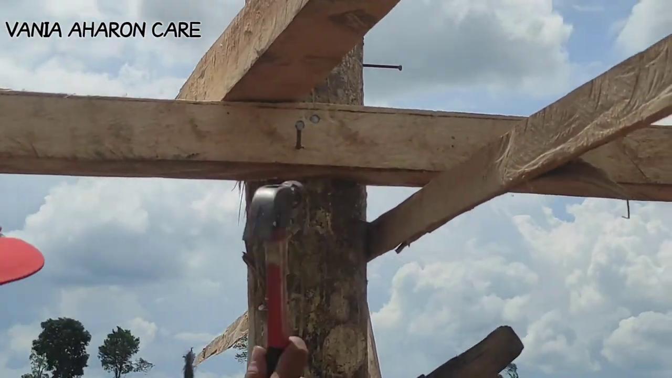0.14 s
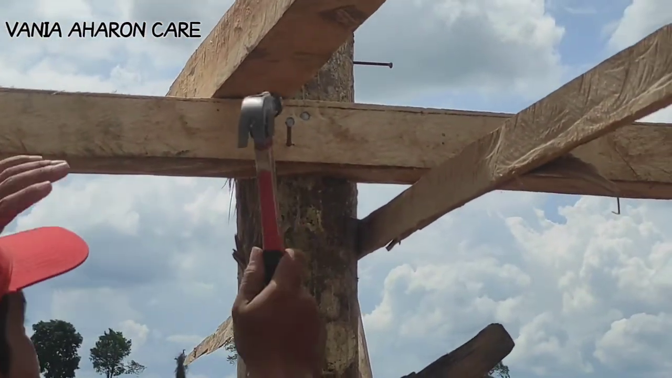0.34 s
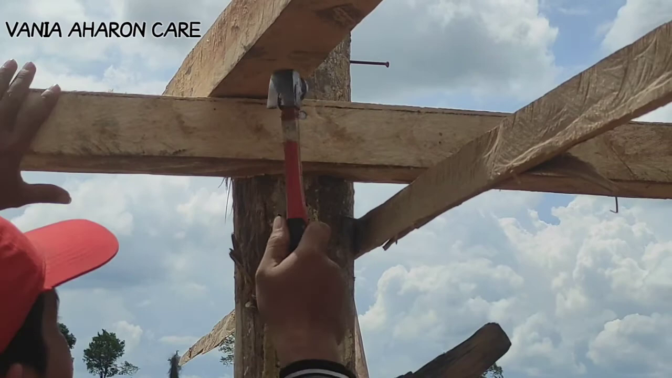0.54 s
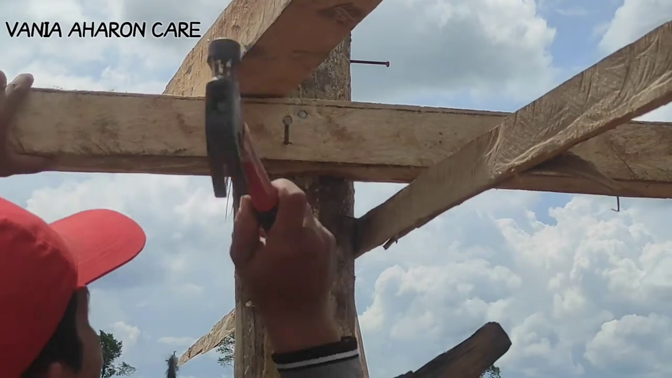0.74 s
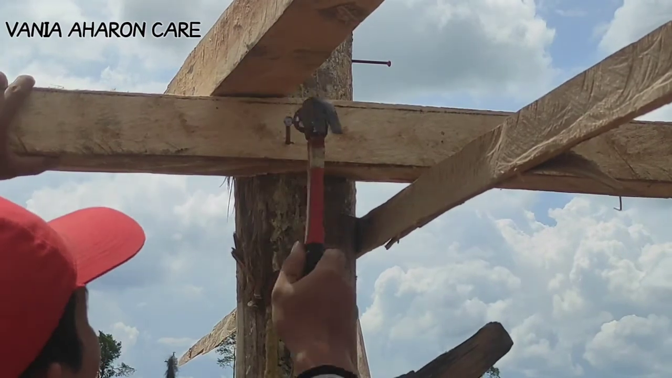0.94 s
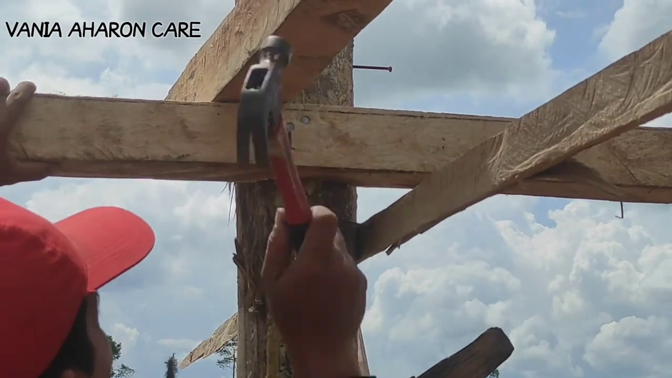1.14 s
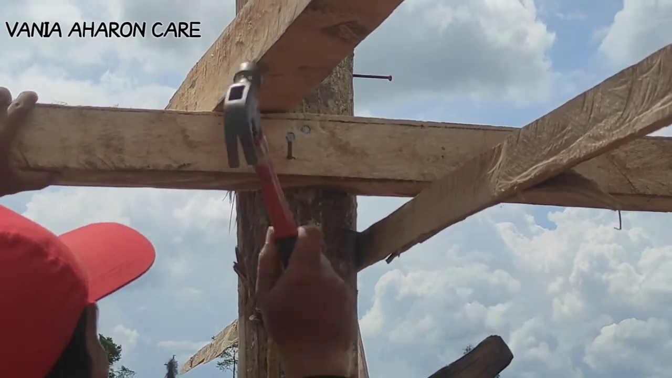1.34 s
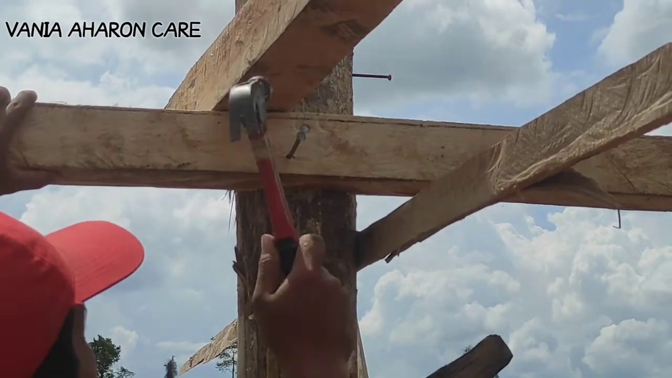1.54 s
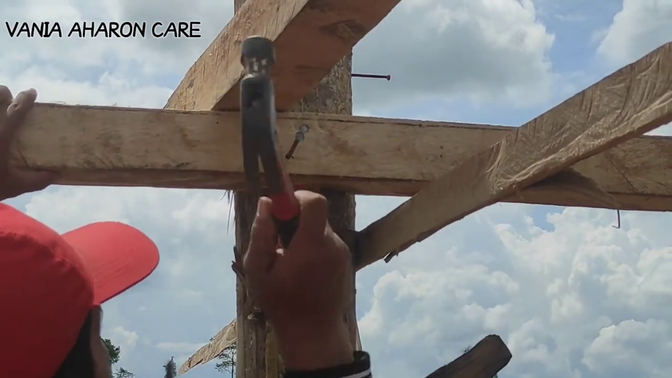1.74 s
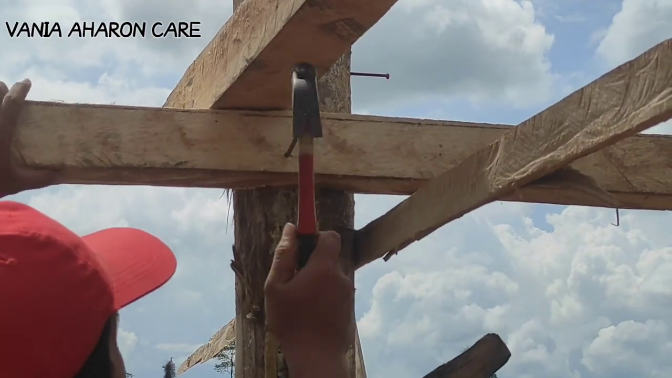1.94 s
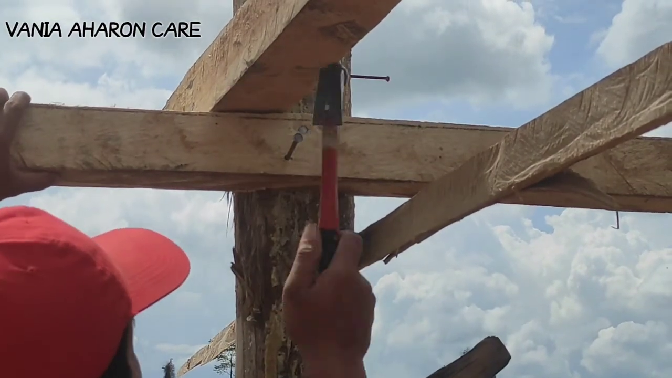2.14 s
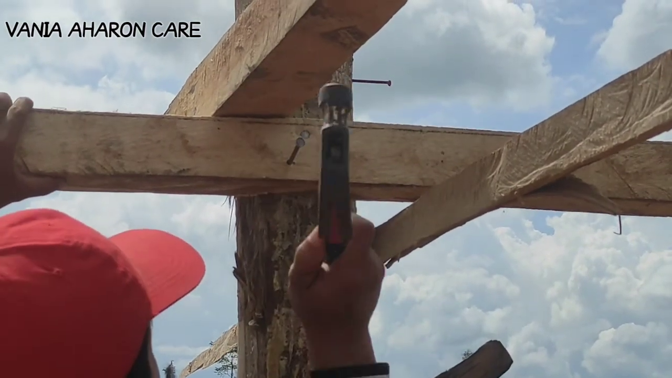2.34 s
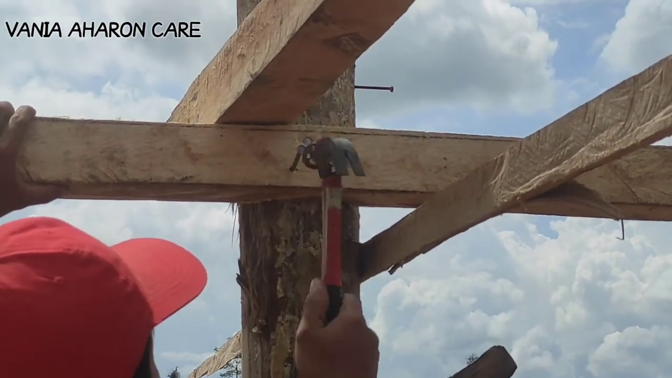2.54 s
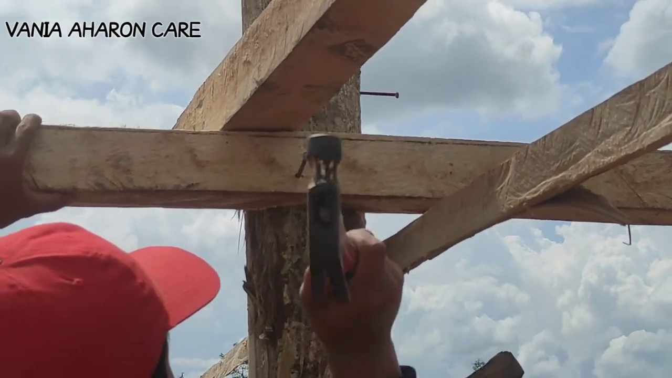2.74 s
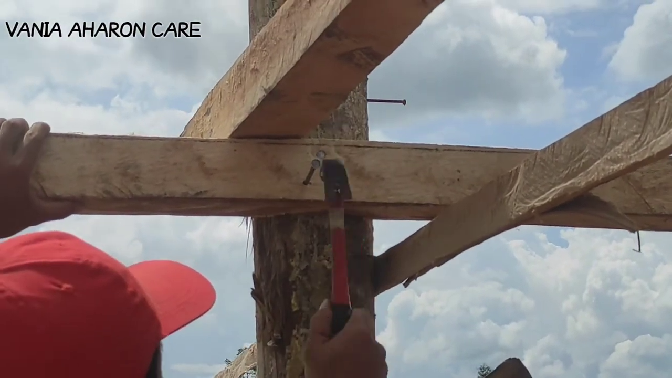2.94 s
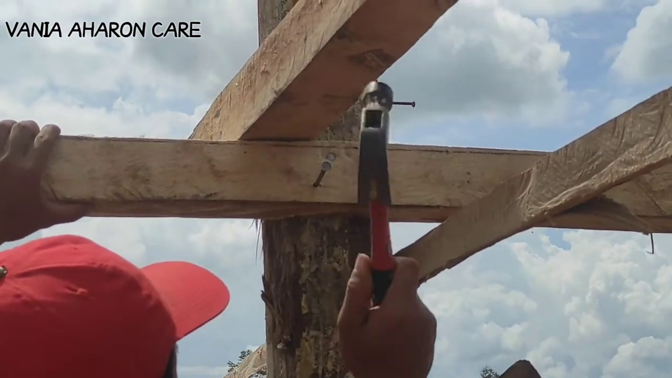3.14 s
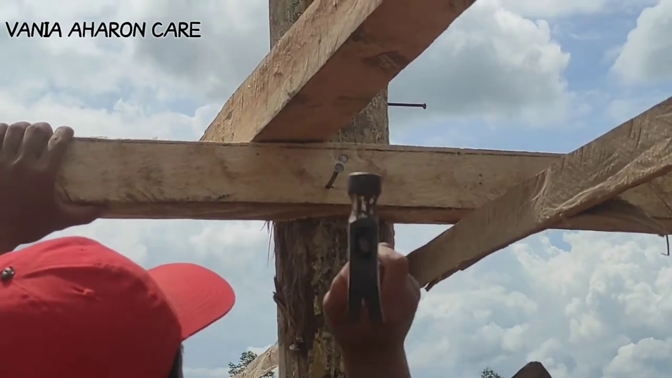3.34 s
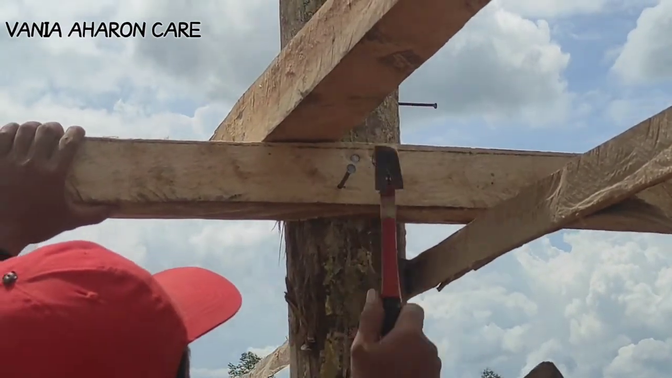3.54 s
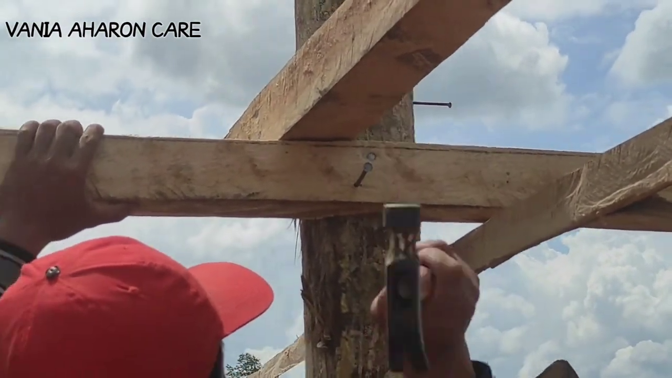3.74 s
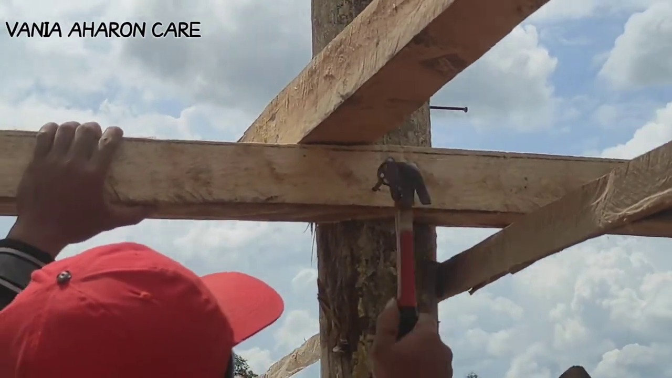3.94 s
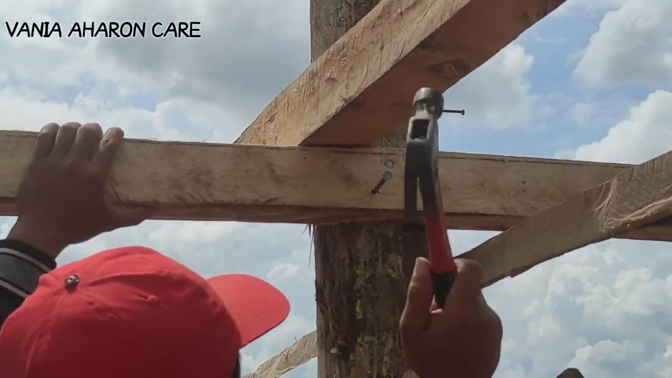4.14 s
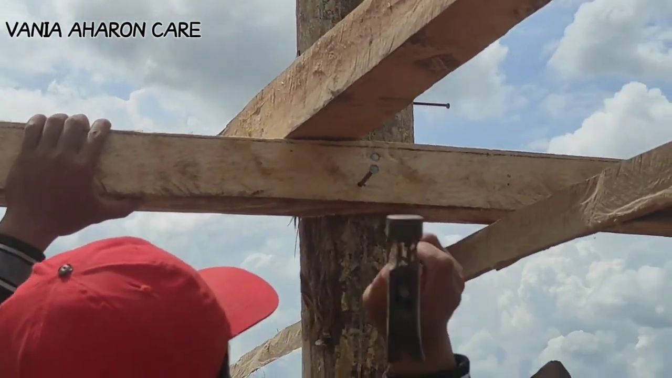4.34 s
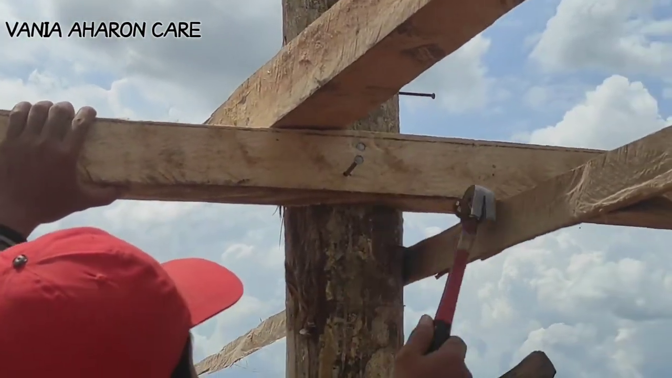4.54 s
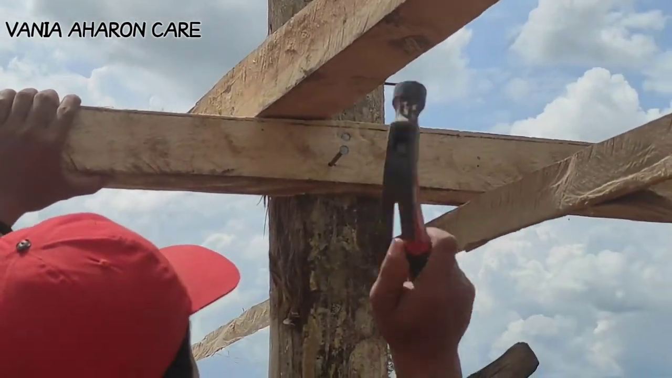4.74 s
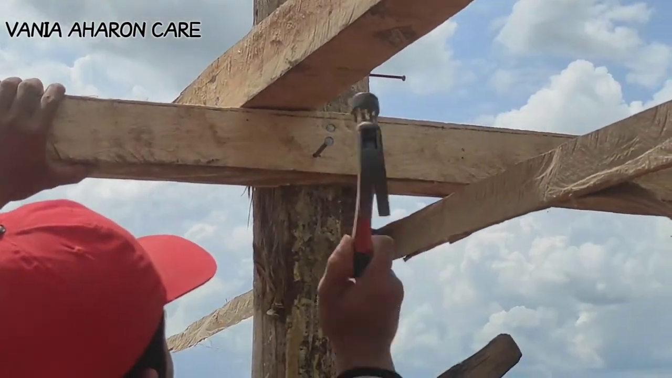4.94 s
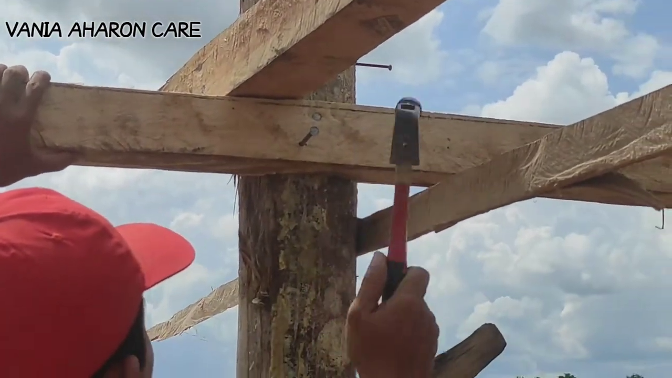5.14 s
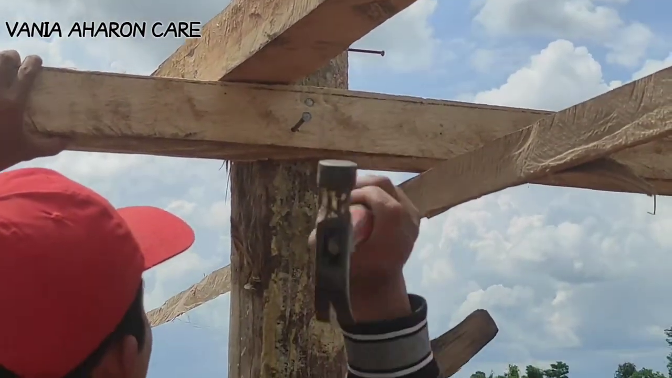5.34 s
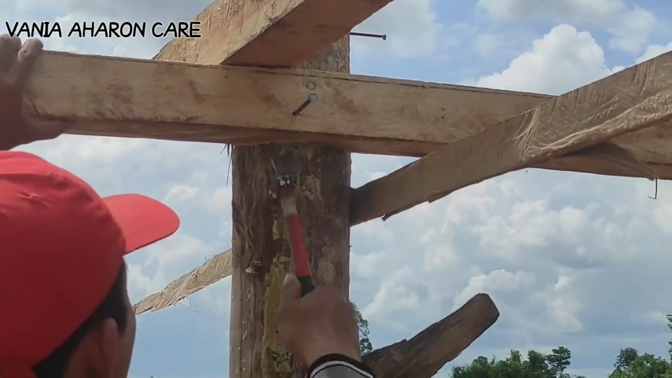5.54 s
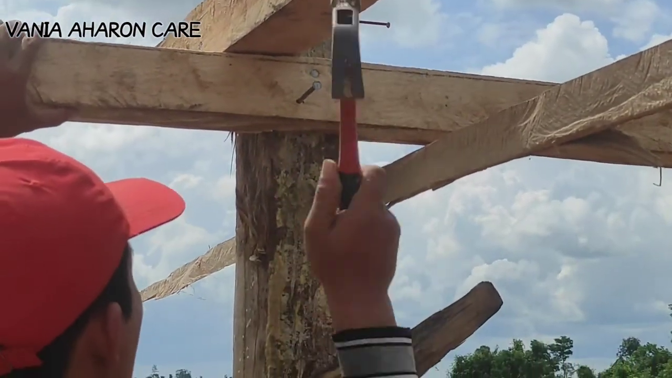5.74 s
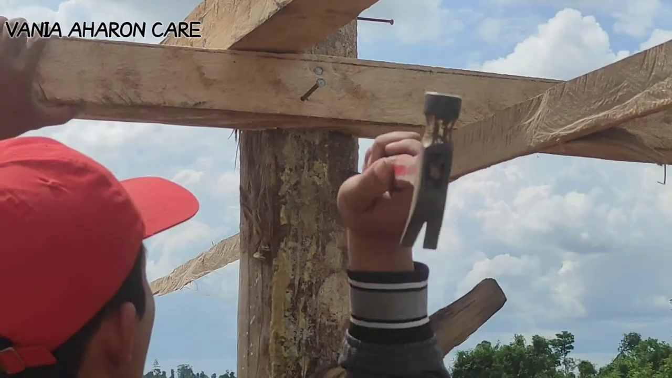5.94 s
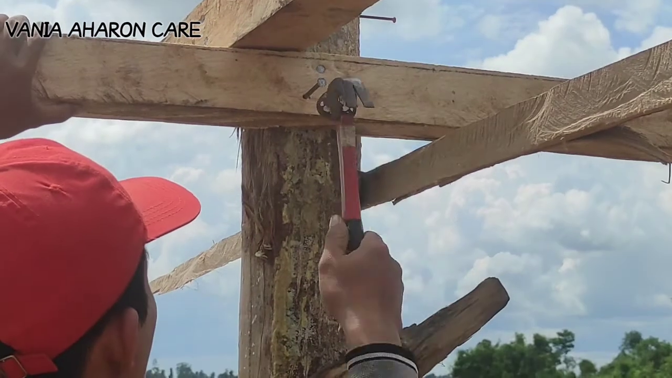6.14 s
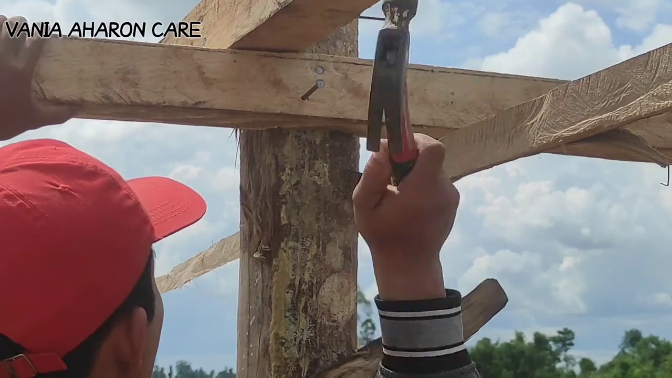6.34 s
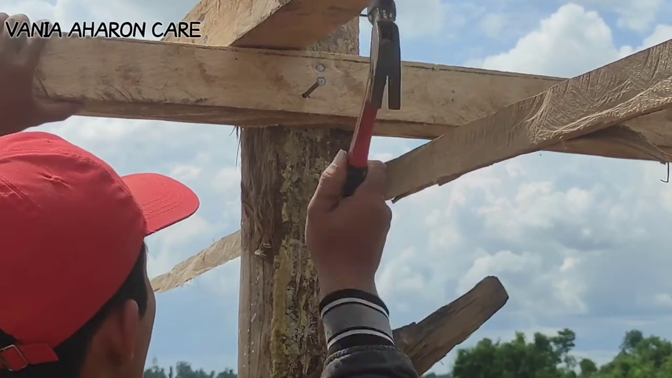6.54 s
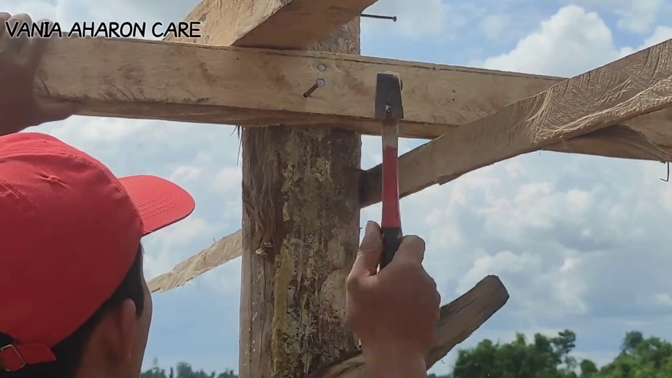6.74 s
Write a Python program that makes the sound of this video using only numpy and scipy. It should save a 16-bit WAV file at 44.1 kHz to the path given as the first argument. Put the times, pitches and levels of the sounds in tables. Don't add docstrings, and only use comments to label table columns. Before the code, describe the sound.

Steady hammer blows on a nail in a wooden frame, each a loud crack, hollow knock and high metallic ping, with breeze and faint birds.

```python
import sys
import numpy as np
from scipy import signal
from scipy.fft import rfft, irfft, next_fast_len
from scipy.io import wavfile
from scipy.ndimage import uniform_filter1d

SR = 44100
rng = np.random.default_rng(int(sys.argv[2]) if len(sys.argv) > 2 else 0)


def linear_from_db(decibels):
    return 10 ** (np.asarray(decibels, float) / 20)


def generate_wav(sig):
    pcm = np.round(np.clip(np.atleast_2d(sig).T, -1, 1) * 32767).astype(np.int16)
    wavfile.write(sys.argv[1], SR, pcm)


N = 299439


def at_hz(points, hz):
    points = np.array(points)
    return np.interp(np.log(hz), np.log(points[:, 0]), points[:, 1])


def in_time(rows):
    s, *columns = np.transpose(rows)
    return [np.interp(np.arange(N) / SR, s, c) for c in columns]


def rms_one(x):
    return x / np.sqrt(np.mean(x ** 2) + 1e-20)


def panned(db):
    return linear_from_db(np.minimum(np.array([db, -db]), 0))


def clicks(times, heights):
    out = np.zeros(np.shape(heights)[:-1] + (N,)) + 1e-18
    out[..., [round(s * SR) for s in times]] = heights
    return out


def drift(rate):
    r = np.exp(-2 * np.pi * rate / SR)
    slow = signal.lfilter([1], [1, -2 * r, r * r], rng.standard_normal((2, N + SR)))
    return rms_one(slow)[:, SR:]


def ring(x, hz, t60):
    r, w = linear_from_db(-60 / (t60 * SR)), 2 * np.pi * hz / SR
    return signal.lfilter([0, np.sin(w)], [1, -2 * r * np.cos(w), r * r], x)


def dying(x, t60):
    return signal.lfilter([1], [1, -linear_from_db(-60 / (t60 * SR))], x)


def filtered(x, order, hz, kind="low"):
    return signal.sosfilt(signal.butter(order, hz, kind, fs=SR, output="sos"), x)


# hz, likeness (0 to 1)
ALIKE = [(200, 0.97), (450, 0.61), (1000, 0.24), (2000, 0.028), (16000, 0)]


def likeness(hz):
    return np.clip(at_hz(ALIKE, hz), 0, 1)


def bands(low, high):
    edges = low * 2 ** np.arange(0, np.log2(high / low) + .01, 1 / 3)
    white = rng.standard_normal((2, 2, N))
    for k, (a, b) in enumerate(zip(edges, edges[1:])):
        mid, side = filtered(white[k % 2], 2, [a, b], "band")
        hz = np.sqrt(a * b)
        alike = likeness(hz)
        yield hz, np.sqrt(1 + alike) * mid + np.sqrt(1 - alike) * side * [[1], [-1]]


def bell(at, width):
    out = np.zeros(N)
    near = np.arange(max(int((at - 4 * width) * SR), 0), min(int((at + 4 * width) * SR), N))
    out[near] = np.exp(-.5 * ((near / SR - at) / width) ** 2)
    return out


# time_s, level_db
INSECT_LEVEL = [(0, -102), (.2, -74), (.55, -75), (.85, -77), (.95, -92.5), (1.3, -67), (1.5, -73),
                (1.9, -85.5), (2.4, -77.5), (2.8, -87), (3.3, -68), (3.5, -90), (3.9, -75.5), (4.4, -87),
                (5.0, -75), (5.3, -88.5), (5.9, -77.5), (6.79, -80.5)]


def insects():
    band = filtered(rng.standard_normal((2, N)), 4, [2340, 2600], "band")
    return rms_one(band) * linear_from_db(in_time(INSECT_LEVEL)[0] + 2.0 * drift(30))


# hz, level_db (per Hz)
LEAF_COLOUR = [(180, -30.5), (300, -21), (496, -19), (577, -18), (694, -25), (742, -24), (1040, -24),
               (1400, -25), (2000, -23), (2500, -26), (3150, -26.5), (4000, -28.5), (5000, -29.5),
               (6400, -28), (8000, -28.5), (10000, -44.5), (14700, -59.5), (16500, -65.5)]
# time_s, level_db
LEAF_RUSTLE = [(0.0, -72), (.15, -76), (0.3, -64.5), (0.56, -69.5), (0.9, -76.5), (1.2, -73.5),
               (1.49, -68.5), (1.85, -76.5), (2.35, -73), (3.4, -76.5), (3.75, -69.5), (4.0, -69),
               (4.4, -77), (5.6, -78.5), (5.9, -68.5), (6.45, -84), (6.79, -58.5)]
# time_s, level_db
LEAF_HISS = [(0, -67.5), (.2, -66.5), (.55, -61), (.9, -73), (1.3, -65.5), (1.5, -69), (1.85, -68),
             (2.1, -71.5), (2.5, -70.5), (3.0, -71), (3.5, -72), (3.9, -66.5), (4.4, -70.5), (5.0, -69.5),
             (5.5, -67.5), (5.9, -67.5), (6.45, -71.5), (6.79, -60.5)]


def leaves():
    rustle = linear_from_db(in_time(LEAF_RUSTLE)[0] + 36.0 + 2.6 * drift(4.5))
    hiss = linear_from_db(in_time(LEAF_HISS)[0] + 29.5 + 0.75 * drift(6))
    return rustle, hiss, hiss * linear_from_db(-8.0)


# start_s, length_s, start_hz, end_hz, level_db
BIRD_CALLS = [(0.285, 0.05, 5840, 5640, -63), (0.912, 0.037, 5450, 5650, -60),
              (1.413, 0.066, 5920, 5540, -46.5), (2.773, 0.047, 4000, 4000, -61),
              (2.812, 0.022, 5050, 5050, -62), (3.243, 0.046, 2510, 2180, -56.5),
              (3.3, 0.029, 2320, 2270, -62), (4.954, 0.034, 2450, 2200, -69.5),
              (3.007, 0.031, 4500, 4270, -58), (5.265, 0.039, 4030, 4070, -60.5),
              (5.303, 0.041, 5100, 5000, -61), (5.507, 0.046, 4460, 4200, -54)]


def birds():
    out = np.zeros(N)
    for s, length, start_hz, end_hz, level_db in BIRD_CALLS:
        u = np.linspace(0, 1, int(length * SR))
        phase = 2 * np.pi * np.cumsum(start_hz + (end_hz - start_hz) * u ** 2) / SR
        first = int(s * SR)
        out[first:first + len(u)] += linear_from_db(level_db) * np.sin(np.pi * u) * np.sin(phase)
    return out * np.array([[1], [.6]]) * (.6 + .6 * drift(90))


# start_s, peak_db, centre_hz, length_s
SMALL_TICKS = [(0.056, -65.5, 7400, 0.031), (0.14, -62, 7700, 0.0069), (0.394, -42.5, 1550, 0.016),
               (1.853, -59.5, 7600, 0.015), (1.877, -51.5, 7500, 0.0026), (1.97, -57, 1860, 0.011),
               (2.015, -69, 7500, 0.032), (3.512, -56.5, 7600, 0.0069), (4, -65, 7100, .015),
               (5.978, -66, 6400, 0.0071), (6.019, -62, 7500, 0.0049), (3.766, -47.5, 1910, 0.0093),
               (3.767, -62, 4440, 0.014), (3.768, -45, 1210, 0.019), (3.783, -58, 2000, 0.011)]


def ticks():
    out = np.zeros((2, N))
    for s, level_db, hz, length in SMALL_TICKS:
        size, first = int(length * SR), int(s * SR)
        burst = rng.standard_normal((2, 2000))[:, :size] * np.hanning(size)
        burst = filtered(burst, 3, [hz / 1.27, hz * 1.19], "band")
        out[:, first:first + size] += linear_from_db(level_db + 14.0) * burst
    return out


# hz, level_db (per Hz)
TURBULENCE = [(20, 2.5), (60, 0.5), (120, -7), (200, -7), (300, -30), (500, -43.5), (900, -62)]
# time_s, level_db
STEADY_BREEZE = [(0, -54), (.8, -56), (1.1, -56), (1.6, -58.5), (2.15, -60), (2.4, -55), (3.2, -53.5),
                 (4.0, -57.5), (4.9, -49), (5.7, -47.5), (6.79, -45.5)]
# centre_s, level_db, length_s, left_right_db
GUST_SWELLS = [(0.009, -39, 0.036, -25), (0.154, -48.5, 0.053, 10.5), (.44, -46.5, .1, -10),
               (0.716, -47, 0.024, -10), (0.792, -49.5, 0.052, 12), (0.907, -46.5, 0.049, -8.5),
               (1.335, -43.5, .08, -12.5), (1.684, -44.5, 0.054, -4), (1.857, -44.5, 0.036, -21),
               (2.059, -44.5, 0.03, -20.5), (3.474, -55, .08, -9), (3.934, -48.5, 0.061, -14.5),
               (4.249, -46, 0.043, -3.5), (4.553, -43.5, 0.036, 7.5), (4.727, -29.5, 0.024, -15),
               (4.944, -41, .06, -2), (5.28, -38.5, 0.024, -16), (5.477, -39, 0.035, -19),
               (5.64, -41, 0.075, -9), (5.847, -40, 0.096, -10), (6.029, -43, 0.045, 8.5),
               (6.111, -27, 0.039, -14), (6.25, -40, 0.05, -11.5), (6.345, -32, 0.036, -14),
               (6.471, -31.5, 0.051, -13.5), (6.679, -44, 0.038, 7), (6.752, -44.5, 0.044, -18.5)]


def wind(lumpy_db=5.5, even=1.0):
    force = linear_from_db(in_time(STEADY_BREEZE)[0]) * panned(-4.5)[:, None]
    for s, db, length, pan_db in GUST_SWELLS:
        force = force + linear_from_db(db) * panned(pan_db)[:, None] * bell(s, length)
    bright_db = 0.8753 * (20 * np.log10(force) + 40.5)
    edges, out = 18 * 2 ** np.arange(0, 6, .5), 0
    for a, b in zip(edges, edges[1:]):
        hz = np.sqrt(a * b)
        noise = filtered(rng.standard_normal((2, N)), 2, [a, b], "band")
        reach = np.clip(np.log2(hz / 100) / 0.54, 0, 1.5)
        out = out + noise * linear_from_db(at_hz(TURBULENCE, hz) + bright_db * reach)
    body = filtered(out, 2, 150)
    swell = np.sqrt(uniform_filter1d(body ** 2, size=2600) / np.mean(body ** 2) + 0.0091)
    steady = out / swell ** np.clip(even, 0, 1)
    return steady * force * linear_from_db(25.5 + lumpy_db * drift(17))


# start_s,
# peak_db, pitch_hz, left_right_db
SOFT_THUMPS = [(0.01, -26.5, 217, -24), (0.315, -23.5, 260, -29), (0.914, -46.5, 210, -1),
               (1.832, -35.5, 192, -15), (2.054, -26, 186, -22), (4.389, -31.5, 212, -13.5),
               (4.688, -20, 213, -21), (4.703, -22, 317, -14.5), (4.719, -22, 227, -21),
               (4.733, -20.5, 227, -21), (4.745, -28.5, 193, -17), (4.824, -26, 282, -25.5),
               (4.957, -26, 328, -27), (5.453, -19, 273, -31), (5.29, -35, 336, -18),
               (5.468, -19.5, 137, -10.5), (5.582, -21, 276, -25), (5.591, -14, 260, -30),
               (6.099, -23.5, 300, -4), (6.114, -20.5, 184, -4), (6.134, -27.5, 606, -23),
               (6.13, -11, 335, -31), (6.351, -27, 265, -7), (6.388, -28.5, 450, -19),
               (1.498, -29.5, 155, 10), (3.041, -27, 155, 6.5), (4.051, -28.5, 160, 7),
               (4.561, -25, 155, 5.5), (6.21, -26, 300, -12), (6.246, -31, 280, -20),
               (6.279, -29, 330, -15), (6.309, -30, 262, -8), (6.42, -13, 386, -32), (6.331, -23, 234, -14),
               (6.431, -21, 300, -16), (6.455, -22, 267, -13), (6.497, -30.5, 435, -25.5),
               (5.597, -27, 473, -18), (5.462, -36.5, 520, -16)]


def soft_thumps(cycles=4.5):
    out, click = np.zeros((2, N)), np.eye(1, 3000)[0]
    for s, level_db, hz, pan_db in SOFT_THUMPS:
        pulse = ring(ring(click, hz * 0.8, cycles / hz), hz * 1.2, cycles / hz)
        pulse = filtered(pulse, 2, hz * 4.0)
        pulse = linear_from_db(level_db) * pulse / np.abs(pulse).max()
        first = round(s * SR)
        out[:, first:first + 3000] += panned(pan_db)[:, None] * pulse
    return out


# start_s, bright_db, body_db, body_hz, left_right_db
WIND_SNAPS = [
    (0.4025, -50, -30, 1630, 6),
    (5.888, -45, -35, 723, -28),
    (5.984, -21, -12.5, 791, -36),
    (6.0588, -38, -8.5, 537, -42),
    (6.085, -7.5, 0.5, 873, -53),
]


def wind_snaps():
    out, click = np.zeros((2, N)), np.eye(1, 3000)[0]
    bright = ring(click, 7400, 0.0043) + 1.4 * ring(click, 5900, 0.00077) + 0.8 * click
    for s, bright_db, body_db, hz, pan_db in WIND_SNAPS:
        body = ring(ring(click, hz, 6.1 / hz), hz * 2.0, 2.7 / hz)
        pulse = linear_from_db(bright_db) * bright + linear_from_db(body_db) * body / np.abs(body).max()
        first = round(s * SR)
        out[:, first:first + 3000] += panned(pan_db)[:, None] * pulse
    return out


# delay_s, level_db, t60_s
RETURNS = [
    (0.01, -14.5, 0.036),
    (0.041, -25.5, 0.093),
    (0.064, -29, .06),
]


def echoes(tail):
    near = sum(linear_from_db(db + 24.5) * np.roll(dying(tail, t60), int(lag * SR), axis=1) for lag, db, t60 in RETURNS)
    near[:, :SR // 4] = 0
    late = np.pad(dying(tail, 0.173), ((0, 0), (int(0.13 * SR), 0)))[:, :N]
    return uniform_filter1d(near, size=400), linear_from_db(-22.5) * uniform_filter1d(late, size=600)


# extra_db near 700 Hz, extra_db near 1 kHz
HOLLOWNESS = [(2.5, -3.5), (-0.5, -4), (3.5, -5), (4, -2.5), (-1.5, -1), (-4.5, -3.5), (-2, -2), (0, -2.5),
              (1, 0.5), (2.5, -1.5), (4.5, 0.5), (2, -2), (0.5, -0.5)]
# edge_db, cheek_db, face_db, sparkle_db
HEAD_TILT = [(-1, -3.5, -5, -3), (2, 0.5, 3, 7), (-0.5, 5, 0.5, 1), (1, 0.5, 0.5, -3), (-3.5, 5, -1.5, 2),
             (-8.5, 3, -3.5, 3), (-4, 1, 1.5, 2.5), (1.5, 1, 2, 3), (1, -7, -3.5, -3.5),
             (5.5, 0, -0.5, 2.5), (4.5, -2, 0.5, -6.5), (2, 1.5, -1, 2), (-2, 1, 0, 8)]
TILT_HZ = [400, 700, 1000, 2100, 3500, 5700, 8000, 13000]


def directivity_db(hz):
    colours = [(0, *hollow, 0.6 * blow[-1], *tilt) for hollow, tilt, blow in zip(HOLLOWNESS, HEAD_TILT, KNOCKS)]
    return np.array([at_hz(list(zip(TILT_HZ, colour)), hz) for colour in colours])


BLOW_TIMES = [0.5846, 1.0289, 1.4921, 2.1081, 2.5576, 3.0394, 3.5343, 4.0455, 4.5576, 5.0906, 5.6203,
              6.1673, 6.6811]
# crack_db, left_right_db, scattered_tail_db, extra_db above 9.5 kHz
STEEL_CRACKS = [(-11.5, 3.5, -40, -12), (-9, 5.5, -32, 1), (-10, 8.5, -35, 1), (-8.5, 3, -35, -4.5),
                (-8.5, 4.5, -30.5, -2), (-9.5, 4, -27.5, 3.5), (-7.5, 2, -29, -1.5), (-9, 2.5, -29, -1.5),
                (-9.5, 1, -30, -3), (-9, 4, -29.5, -6.5), (-10, 0.5, -30.5, -13.5), (-10, 2.5, -29, -3),
                (-6, 1.5, -30, -4)]
# hz, level_db (per Hz)
CRACK_COLOUR = [(200, -20), (500, -8.5), (900, -5.5), (2000, 0.5), (3500, -17.5), (5500, -12.5), (7800, -1),
                (10000, -26), (13000, -22), (16500, -29.5)]
# hz, t60_s
CRACK_DECAY = [(200, 0.25), (900, 0.092), (3000, 0.056), (8000, 0.016), (16000, 0.0041)]
# hz, level_db (per Hz)
CONTACT_COLOUR = [(1000, 0), (3000, -23), (7800, -5.5), (12000, -16), (16500, -3)]
# hz, level_db (per Hz)
TAIL_COLOUR = [(200, 0), (500, -4.5), (1000, -8), (2200, -11.5), (3500, -16), (5500, -14), (8000, -6),
               (10000, -31), (12000, -40), (16500, -43.5)]
# hz, t60_s
TAIL_DECAY = [(200, 0.8), (700, 0.36), (2000, 0.3), (5000, 0.35), (8000, 0.27), (16000, 0.067)]
# hz, level_db
NEAR_COLOUR = [(300, -15.5), (1000, -6), (3500, -1.5), (8000, -15), (16000, -8)]
# hz, level_db
TREE_COLOUR = [(1000, 0), (4000, -5), (6400, -10), (8000, -3), (10000, 2)]


def crack_tail_and_leaves(grain_db=0.0, patch_db=1.5):
    rows, out = np.array(STEEL_CRACKS), 0
    sides = panned(rows[:, 1])
    crack = clicks(BLOW_TIMES, linear_from_db(rows[:, 0]) * sides)
    tail = clicks(BLOW_TIMES, linear_from_db(rows[:, 2]) * sides)
    near, late = echoes(tail)
    contact = dying(clicks(BLOW_TIMES, linear_from_db(rows[:, 0])), .008)
    contact = uniform_filter1d(contact, size=30, origin=14)
    latest = np.maximum(np.searchsorted(BLOW_TIMES, np.arange(N) / SR, side="right") - 1, 0)
    top = linear_from_db(rows[latest, 3])
    rustle, hiss, treble_hiss = leaves()
    grain = linear_from_db(grain_db * drift(99) + 4.0 * drift(25))
    patches = rng.standard_normal((30, len(rows)))
    for k, (hz, noise) in enumerate(bands(139.1, 19000)):
        level = linear_from_db(at_hz(CRACK_COLOUR, hz) + 5.5) * dying(crack, at_hz(CRACK_DECAY, hz))
        scattered = dying(tail, at_hz(TAIL_DECAY, hz))
        scattered += near * linear_from_db(at_hz(NEAR_COLOUR, hz)) + late * linear_from_db(at_hz(TREE_COLOUR, hz))
        level += linear_from_db(at_hz(TAIL_COLOUR, hz) + 11.0) * scattered
        blow_gain = linear_from_db(patch_db * patches[k] * (hz > 2500) + directivity_db(hz))
        level = level * np.roll(grain, k * 3001, axis=1) * blow_gain[latest]
        level = level + linear_from_db(at_hz(CONTACT_COLOUR, hz)) * contact
        if hz > 9500:
            level = level * top
        foliage = rustle if hz < 3000 else hiss if hz < 9500 else treble_hiss
        out = out + noise * (level + linear_from_db(at_hz(LEAF_COLOUR, hz)) * foliage)
    port = np.gradient(ring(out, 7600, 0.0018), axis=1)
    return out * linear_from_db(-1.5) + 0.15 * port


# level_db, hangs_free_s, edge_on_s, dip_db
HEAD_RINGS = [(-41.5, 0.014, 0.054, -11), (-36, 0.16, 0.35, 1), (-33.5, 0.12, 0.055, -26.5),
              (-44.5, 0.13, 0.063, -9.5), (-28, 0.073, 0.076, -8.5), (-33, 0.14, .13, -5),
              (-29, 0.13, 0.1, -11.5), (-31.5, 0.12, 0.081, -9), (-44, 0.18, 0.15, -5),
              (-31, 0.15, 0.1, -13), (-40, 0.23, 0.061, -21.5), (-39.5, 0.17, 0.079, -10.5),
              (-29, .15, 0.068, -3.5)]
# multiple of pitch, level_db, share of decay, share of dip
HEAD_PARTIALS = [(.468, -30, .8, -.2), (0.999, 2.5, 0.93, .93), (1.533, -31, .75, .5),
                 (2.067, -39, 0.8, .5)]
# third_partial_db, fourth_partial_db
UPPER_PARTIALS = [(-4.5, -2.5), (0.5, 2.5), (0.5, 5), (0, -8), (-1.5, -7.5), (-2.5, -2.5), (-0.5, 2.5),
                  (-1, 2), (0, -7), (-1.5, -6), (-3, -17.5), (0.5, -10), (1, 2)]


def hammer_head():
    length_s = .36
    out, t = np.zeros((2, N)), np.arange(int(length_s * SR)) / SR
    pitch_hz = 7280 + 52 * np.exp(-.5 * ((t - .165) / .08) ** 2)
    phase = 2 * np.pi * np.cumsum(pitch_hz) / SR
    fade = np.clip(np.minimum(t, length_s - t) / 0.0033, 0, 1)
    for s, (level_db, free_s, turn_s, dip_db), upper in zip(BLOW_TIMES, HEAD_RINGS, UPPER_PARTIALS):
        start = rng.uniform(0, 2 * np.pi, (len(HEAD_PARTIALS), 1, 1)) + [[0], [1.6]]
        fall_db = -64 * np.minimum(t, free_s) - 243 * np.maximum(t - free_s, 0)
        edge_db = dip_db * np.exp(-.5 * ((t - turn_s) / 0.022) ** 2)
        tone = 0
        for (k, db, share, dips), a, extra_db in zip(HEAD_PARTIALS, start, (0, 0, *upper)):
            tone = tone + linear_from_db(db + extra_db + share * fall_db + dips * edge_db) * np.sin(k * phase + a)
        first = int((s + .004) * SR)
        out[:, first:first + len(t)] += (tone * 2 * linear_from_db(level_db) * fade)[:, :N - first]
    return out * linear_from_db(2.5 * drift(7)[0] * [[1], [-1]])


def ground_bounce(x, delay_s=0.024, bounce_db=-2.5):
    dull = filtered(x[::-1], 3, [6000, 8500], "band")
    late = np.pad(dull, ((0, 0), (int(delay_s * SR), 0)))[:, :N]
    return x + linear_from_db(bounce_db) * drift(18) * late


# start_s, pitch_hz, level_db, t60_s
NAIL_SHANK = [
    (3.049, 427, -40, 0.77),
    (3.545, 474, -36.5, 0.69),
    (4.056, 544, -42, 0.61),
    (4.567, 605, -37, 0.46),
]


def nail_shank():
    return sum(ring(clicks([s], [linear_from_db(db)]), hz, t60) for s, hz, db, t60 in NAIL_SHANK)


# level_db, post_db, beam_db, joist_ends_db
KNOCKS = [(-13, -8.5, 2, -3), (-11.5, -3.5, -4, -3.5), (-15, -6, 7, 5), (-14.5, -5, 4.5, 0),
          (-13, -0.5, -14, -0.5), (-15, -3, -12.5, -4.5), (-14, -1, -2, -3.5), (-14.5, 0.5, 0, 1.5),
          (-14.5, -1, -7.5, -4), (-13, 0, -7, 0), (-17.5, 0, 9, -8.5), (-18.5, 5, 5, 0),
          (-15, 0.5, -7.5, -8.5)]
MEMBER_HZ = [300, 700, 1000, 1900]
# braces_db, rafter_db, battens_db, laths_db
LIGHT_MEMBERS = [(-1, -2, -0.5, 0.5), (-4, -10.5, -4.5, -0.5), (-2.5, 0, -4.5, -4), (0.5, 3.5, -18, 0),
                 (8, 1, 1.5, -3), (4, -4, -2, 2.5), (1, -10, -2, 2), (-3, -19, 2, -1.5), (4.5, 7, 6, -3),
                 (3, 5, 6.5, -15.5), (-1.5, -1, 16.5, -13), (-3.5, 2.5, 16.5, -5), (6, 8, 14, -5)]
LIGHT_MEMBER_HZ = [350, 460, 590, 700, 1000, 1300, 1900, 2400]
# sill_db, face_db, post_left_right_db, face_left_right_db, ends_left_right_db
STRUCK_PLACE = [(3, 3, 3, -2.5, 1.5), (0.5, -0.5, 4, -1.5, 0.5), (1.5, 1.5, 3.5, 0, -1.5),
                (2, 3, 5, 0.5, 0), (-0.5, 3, 3, -2.5, 2), (4, -2.5, 1.5, -14, -6), (2.5, 0.5, 3.5, 2, 0),
                (3, 1, 1, 3.5, -1.5), (2.5, 1, 0.5, 0, -2.5), (2.5, -1, 3, 6.5, 0),
                (-1.5, 0.5, 1.5, 2.5, -1), (1.5, 1, 2.5, 6.5, -12), (1.5, -3.5, 1, 6, -5)]
STRUCK_HZ = [230, 300, 880, 980, 1110]
SIDE_HZ = [450, 700, 950, 1200, 1700]
# pitch_hz, level_db, t60_s
FRAME_MODES = [(192, -17, 0.55), (241.8, -13, 0.45), (307.3, 2.5, 0.1), (353, -12, 0.25), (445.8, -5, 0.18),
               (450.5, -12.5, 0.28), (501, -15.5, 0.054), (574, -8.5, 0.16), (685.5, -3.5, 0.096),
               (715, 1, 0.11), (769.3, -8.5, 0.17), (877, -5, 0.092), (976, 3.5, 0.092), (1045, -8, 0.04),
               (1151, -5, 0.095), (1254, -11.5, 0.072), (1338, -15.5, .07), (1520.5, -15, 0.052),
               (1437, -12, 0.1), (1716, -13.5, 0.056), (2040, -13, 0.064), (1699, -1.5, 0.02),
               (1888, -3, 0.1), (2190, -6, 0.06), (2365, -11, 0.06), (2305, -5.5, 0.022), (2575, -11, 0.06)]


def timber(scatter_db=2.0, spread_s=0.0076):
    def member_db(at, values):
        return at_hz(list(zip(at, values)), hz)

    out, knock_db = np.zeros((2, N)), np.array(KNOCKS)[:, 0]
    luck = rng.standard_normal((len(KNOCKS), len(FRAME_MODES), 2))
    paths = rng.random((len(FRAME_MODES), 4))
    for k, (hz, level_db, t60) in enumerate(FRAME_MODES):
        colour_db = np.array([member_db(MEMBER_HZ, [post, beam, 0, ends]) for _, post, beam, ends in KNOCKS])
        colour_db += [member_db(LIGHT_MEMBER_HZ, [0, a, b, 0, 0, c, 0, d]) for a, b, c, d in LIGHT_MEMBERS]
        colour_db += [member_db(STRUCK_HZ, [sill, 0, 0, face, 0]) for sill, face, *_ in STRUCK_PLACE]
        pan_db = np.array([member_db(SIDE_HZ, [post, 0, face, face, ends])
                           for _, _, post, face, ends in STRUCK_PLACE])
        blow_db = knock_db + colour_db + level_db - 3.5
        blows = clicks(BLOW_TIMES, linear_from_db(blow_db + scatter_db * luck[:, k].T + pan_db * [[.5], [-.5]]))
        tone = ring(blows, hz, t60)
        if k == 1:
            tone = tone + linear_from_db(-3) * ring(blows, 227, t60)
        first = spread_s * 0.91 * paths[k, 0]
        second = spread_s * (0.33 + 0.74 * paths[k, 1])
        for side in (0, 1):
            apart = (1 - likeness(hz)) * paths[k, 2 + side] / hz
            for lag, gain in ((first, .45), (second, .9)):
                shift = int((round(lag * hz) / hz + apart) * SR)
                out[side, shift:] += gain * tone[side, :N - shift]
    return filtered(out + nail_shank(), 2, 150, "high")


def scene():
    blows = timber() + crack_tail_and_leaves() + ground_bounce(hammer_head())
    air = wind() + soft_thumps() + wind_snaps()
    return blows + air + ticks() + birds() + insects()


# start_s, left, right (full scale)
OFFSETS = [(0.587, 0.002, 0.001), (1.029, 0.105, 0.0), (1.4946, -0.081, 0.002), (2.1107, 0.006, -0.002),
           (2.5592, 0.056, 0.004), (3.0396, -0.109, -0.002), (3.5345, 0.099, -0.033),
           (4.0468, -0.085, -0.04), (4.5576, -0.043, -0.024), (5.0919, -0.073, -0.018),
           (5.6222, 0.057, -0.012), (6.169, -0.014, 0.003), (6.6823, -0.039, 0.003)]
# after_blow_s, share
OFFSET_COURSE = [(.002, 0), (.008, 1.7), (.052, 0), (.08, -1.2), (.15, -2.4), (.24, -.8), (.31, 0),
                 (.4, .3), (.6, 0)]


def sway():
    s, share = np.transpose(OFFSET_COURSE)
    t = np.arange(N) / SR
    swings = sum(np.outer([left, right], np.interp(t - at, s, share, left=0, right=0))
                 for at, left, right in OFFSETS)
    return uniform_filter1d(swings, size=120)


def roll_off(x):
    return signal.sosfilt(signal.butter(12, 17030, fs=SR, output="sos"), x)


def record(dry):
    size = next_fast_len(N + SR)
    hz = np.arange(size // 2 + 1) * SR / size
    turns, lowest_hz, ceiling = 2.5, 700, .8
    delay_s = turns / np.maximum(hz, lowest_hz) - turns / 8000
    phase = -2 * np.pi * np.cumsum(delay_s) * SR / size
    late = irfft(rfft(dry, size) * np.exp(1j * phase), size)[:, :N]
    limited = ceiling * np.tanh(late / ceiling) + sway()
    cut = signal.sosfilt(signal.cheby2(10, 60, 17000, fs=SR, output="sos"), limited)
    return roll_off(cut)


dry = scene()
out = record(dry)
generate_wav(out)
```